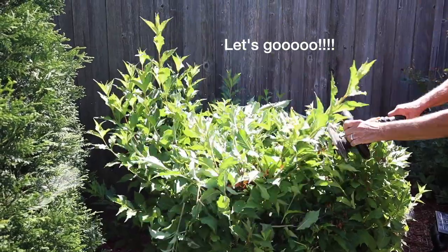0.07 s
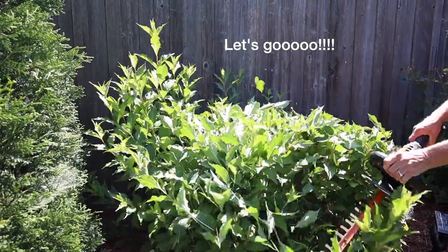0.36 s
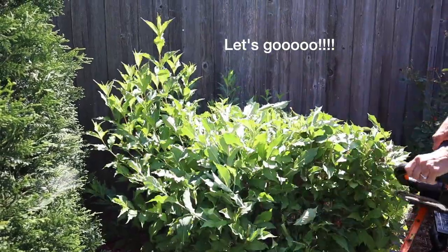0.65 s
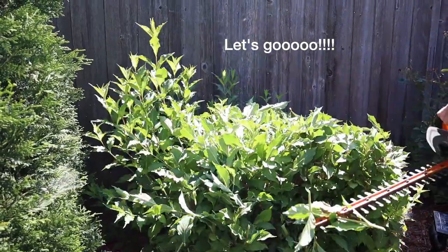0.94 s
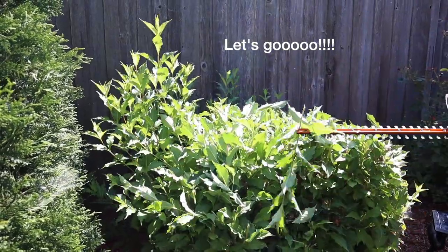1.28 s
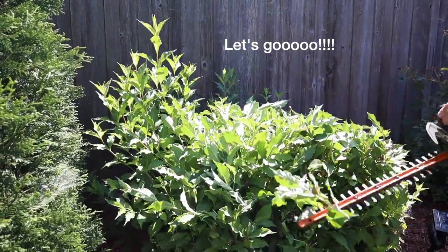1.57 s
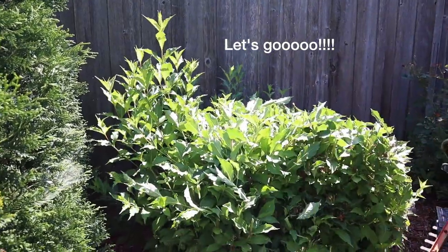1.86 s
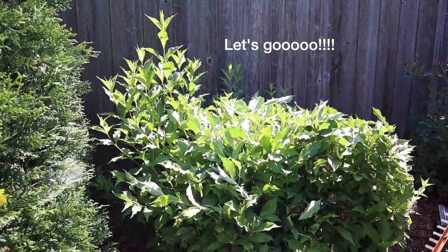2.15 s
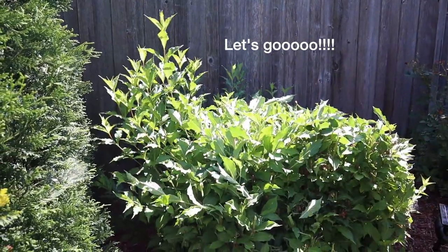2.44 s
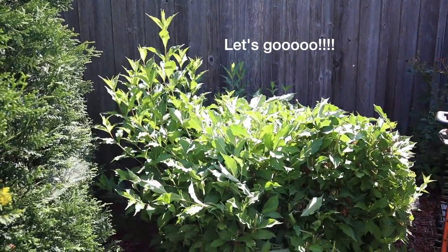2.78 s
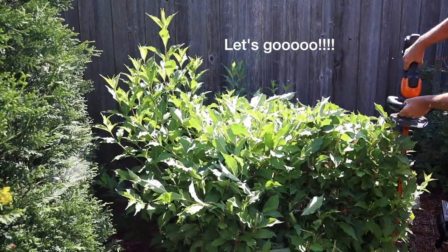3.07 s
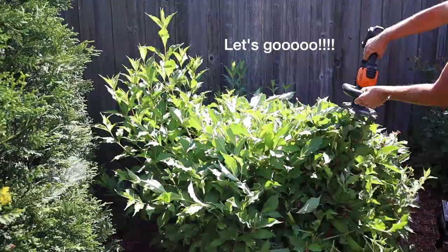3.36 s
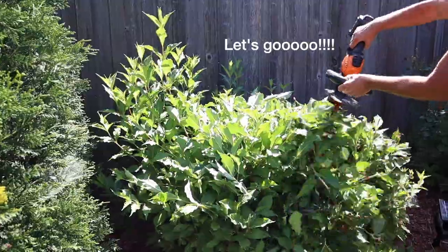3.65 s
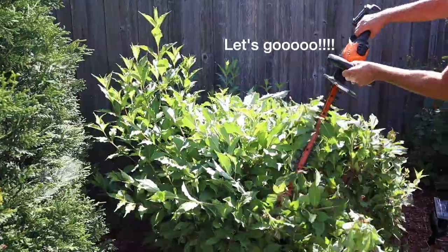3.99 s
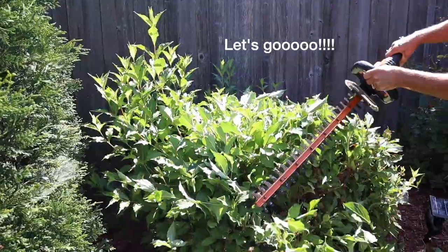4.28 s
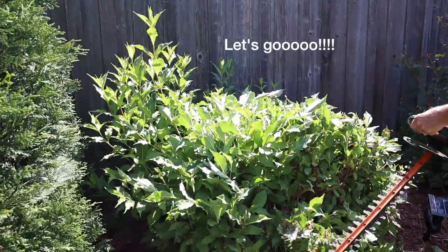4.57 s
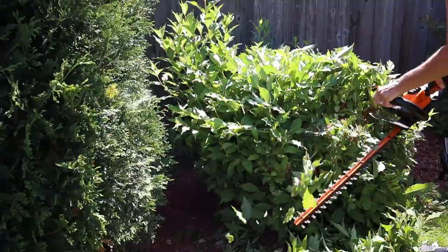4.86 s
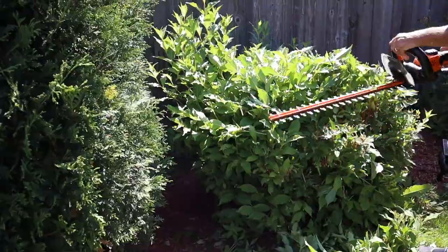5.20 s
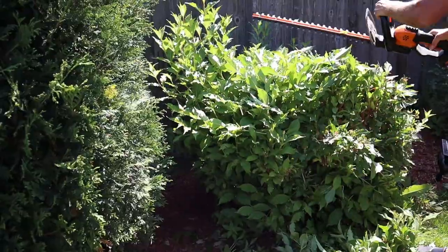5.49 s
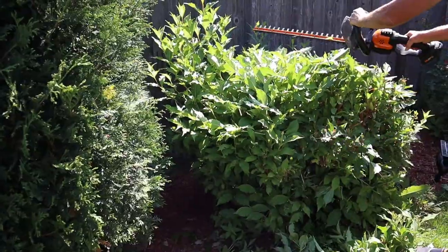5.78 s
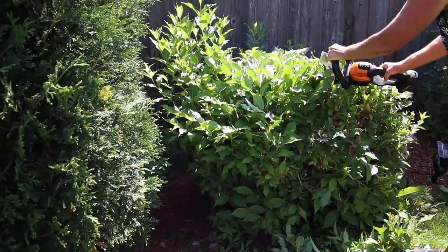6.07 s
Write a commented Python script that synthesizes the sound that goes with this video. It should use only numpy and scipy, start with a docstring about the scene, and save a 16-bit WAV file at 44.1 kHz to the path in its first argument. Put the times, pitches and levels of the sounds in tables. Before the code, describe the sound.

An electric hedge trimmer buzzes and clatters through a leafy shrub in four bursts, with twig snaps, rustling and faint traffic between.

```python
"""A cordless hedge trimmer close to the microphone, in a leafy shrub by a wooden fence, traffic far off.
It opens biting twigs, its steel blades clacking at each reversal and rasping in between. Twigs snap in
the pause, the trigger clicks and a short burst follows. The third burst goes deep: the blades slow and
knock hard. Leaves rustle, the sound drops out for a tenth of a second, and the traffic swells as the
gain control recovers. Last, the trigger clicks again for a light fourth burst."""
import sys
import numpy as np
from scipy import signal
from scipy.fft import rfft, irfft, next_fast_len
from scipy.io import wavfile
from scipy.ndimage import uniform_filter1d

SR = 44100
rng = np.random.default_rng(int(sys.argv[2]) if len(sys.argv) > 2 else 0)


def to_wav(sig):
    """Store sig (one row per channel, or 1-D mono) as 16-bit WAV at the path in sys.argv[1].

    Samples outside -1..1 are clipped; the rate is SR.
    """
    pcm = np.clip(np.atleast_2d(sig), -1, 1) * 32767
    pcm = np.round(pcm).astype(np.int16)
    wavfile.write(sys.argv[1], SR, pcm.T)  # frames by channels


N = 270333
T = np.arange(N) / SR

# Levels in the tables are relative, ahead of the mix and the gain control.
# Trigger held. Each row: on and off in seconds, blade level in dB, housing level in dB.
BURSTS = [(-.1, 0.566, -11, -19.5), (1.58, 1.917, -10, -20.5), (2.676, 4.285, -14, -22.5),
          (5.637, 6.204, -14, -21)]
# How deep the blades sit in the shrub. Each row: time in seconds, load from 0 to 1.
BLADE_LOAD = [(0, 0.39), (.27, 0.34), (.5, 0.12), (2.75, .05), (3.05, 0.21), (3.3, 0.67), (3.55, .85),
              (3.9, .68), (4.25, .55), (4.4, 0.2), (6.13, 0.06)]
# The trimmer swings in and out of the foliage. Each row: time in seconds, level at the microphone in dB.
SWING = [(0, 2), (.3, -1.5), (.52, 1), (1.62, 0), (1.8, 0.5), (2.75, -1), (3.05, -.5), (3.3, 1.5),
         (3.6, 1.5), (3.95, 3.5), (4.28, 0), (5.7, 1), (6.05, -0.5)]
# The crank's play closing. Each row: place in the stroke and strength, both from 0 to 1.
STROKE_CONTACTS = [(0.0, .7), (.07, .6), (.2, .25), (.39, .2), (.66, .2)]
# Blows close by. Each row: start in seconds, level in dB.
TWIG_BITES = [(0.028, 14), (0.055, 13.5), (.08, 4), (.1074, 9.5), (0.157, 11), (.183, 9), (.2085, 11.5),
              (1.727, 7), (3.0848, 7), (3.1302, 4.5), (3.1748, 5), (3.2223, 8), (3.271, 11), (3.3188, 10.5),
              (3.3492, 11.5), (3.3999, 12), (3.4518, 12.5), (3.5529, 13.5), (3.6581, 15.5), (3.7572, 14),
              (4.059, 9.5), (4.2612, 7), (6.107, 2.5)]  # teeth going through thick twigs
BLADE_CLACKS = [(1.586, -20), (2.708, -8), (3.398, 6), (3.555, 8), (4.708, 11)]  # blades taking up play or breaking free
TWIG_SNAPS = [(0.831, -23), (0.8605, -20.5), (0.8782, -17), (1.2979, -28), (1.417, -27), (2.144, -29),
              (4.48, -31), (4.999, -33)]  # idle blades brushing past twigs
# Blades pressed at an angle. Each row: two edges in seconds (either order), pitch and width in Hz,
# level in dB.
BLADE_SQUEALS = [(0.0, 0.253, 3800, 910, -20.5), (0.6, 0.45, 1440, 800, -19.5),
                 (3.5, 2.87, 5600, 750, -27.5), (3, 3.75, 1110, 220, -26.5), (4.5, 3.05, 488, 50, -40.5),
                 (4, 4.3, 470.5, 49, -40), (4, 4.25, 1640, 930, -23.5), (5.88, 6.13, 1450, 350, -27.5),
                 (6.07, 6.13, 3300, 900, -23)]
# The bar after a jolt. Each row: start in seconds, pitch in Hz, level in dB, decay in seconds.
BAR_PINGS = [(1.945, 10700, -40, .022), (1.945, 7950, -31, 0.021), (3.447, 3510, -5, 0.0045),
             (5.672, 680, -15, 0.0069)]
# Trigger and safety catch. Each row: start in seconds, click level in dB, spring level in dB.
TRIGGER_CLICKS = [(1.5284, -9.5, -30), (1.5392, -11, -18), (2.6012, -15, -54), (2.6363, -21.5, -29),
                  (2.665, -17.5, -33), (5.5412, -13, -23), (5.5909, -13, -38)]
# Branches brushed or springing back. Each row: middle and half length in seconds, level in dB.
LEAF_SWELLS = [(.63, 0.14, -39.5), (0.857, 0.059, -55), (1.252, 0.65, -54), (2.017, .12, -49.5),
               (4.41, .22, -43.5), (4.772, 0.15, -46), (5.01, 0.042, -46.5), (5.11, 0.036, -46.5),
               (5.3, 0.52, -58)]
# A faint tone far off. Each row: start and end in seconds, pitch in Hz, level in dB.
DISTANT_TONE = [(5.3, 5.6, 469, -43.5)]
# Resonances of the trimmer's parts. Each row: pitch in Hz, width in Hz, gain in dB.
HOUSING_RESONANCES = [(372, 27, -2), (490, 45, 1), (637, 37, -6.5), (952, 44, -4.5), (1200, 70, -3),
                      (1394, 82, -7), (1430, 180, -12), (1915, 250, -2.5), (2570, 167, 4)]
BAR_RESONANCES = [(468, 32, 0), (515, 40, -2), (1170, 110, -12), (1900, 200, -14)]
SPRING_RESONANCES = [(8550, 200, -7), (8430, 200, -2), (8660, 260, -5), (5840, 160, -12)]
# Spectra of the sources, near to far. Each row: frequency in Hz, level in dB.
STEEL_SPECTRUM = [(1470, -23), (2500, -5), (3680, -2.5), (4490, -3.5), (5490, -1), (6160, -5), (7830, 1),
                  (8660, 2.5), (10000, -3.5), (13800, -3), (15200, -5.5), (15800, -10)]
HOUSING_SPECTRUM = [(100, -32), (250, -14.5), (340, -11.5), (450, -4.5), (560, -0.5), (850, 0), (1200, 0),
                    (1650, 0.5), (2100, 1), (2600, -6), (3400, -6.5), (8000, -39)]
BITE_SPECTRUM = [(150, -10), (350, -15), (500, -26.5), (750, -8), (1100, -7), (2500, -5.5), (4000, -3),
                 (6300, -4), (8200, 6), (10200, -2.5), (12800, 1.5), (16000, -12.5)]
CLACK_SPECTRUM = [(100, -32), (250, -14), (500, -3), (2000, -2.5), (4000, -5.5), (6500, -3.5), (8300, -0.5),
                  (10500, -6), (16000, -5)]
PLASTIC_SPECTRUM = [(400, -36), (1500, -3), (3500, 6), (6000, 2.5), (9000, 0.5), (11000, -12), (16000, -20)]
LEAF_SPECTRUM = [(700, 0), (2000, 0), (4500, -4), (8500, -5.5), (11000, -14), (16000, -13.5)]
TRAFFIC_SPECTRUM = [(100, -13.5), (280, -8.5), (470, -6), (750, 1.5), (1050, 0), (1500, -4), (2300, -14),
                    (4000, -21), (8000, -31), (16000, -47.5)]
RUMBLE_SPECTRUM = [(15, -18), (25, -11), (42, -16.5), (64, 1), (110, -3), (150, -7), (260, -10), (500, -22),
                   (2000, -54.5)]

FREE_STROKES_PER_S, GEAR_RATIO = 44.8, 8
SPIN_UP_S, BRAKE_S = .04, .065  # time constant of the start; time to a standstill
LOAD_SAG = .22  # share of the speed lost at full load
STEEL_SPEED_POWER, HOUSING_SPEED_POWER = 1.77, 0.93  # amplitude grows with these powers of the spin
STEEL_LOAD_DB, HOUSING_LOAD_DB = 4, 5  # boost at full load
NIP_CHANCE, NIP_DB, NIP_SPREAD_DB = .5, -1, 1.3  # thin twigs; the chance is per stroke at full load
WHISTLE_HZ, WHISTLE_DB, WHISTLE_LEAD_S, WHISTLE_S = 3980, -42, .02, .055
STIR_DB = -64  # the leaves are never quite still
LIMIT_DB, LIMIT_SHARE = -12.5, 0.76  # gain control: threshold, share of the excess taken off
DETECTOR_S, RECOVER_DB_PER_S, FIRST_CUT_DB = .008, 5, 10.5
DROPOUT_FROM_S, DROPOUT_TO_S, CUTOFF_HZ = 4.625, 4.731, 15850


def trimmer(steel_db, housing_db, modes_db, bar_db, hum_db, housing_pulse):
    """Close up, teeth chatter under the stroke force; blades, housing and blade bar radiate it."""
    spins, speed, load = motor()
    _, _, burst_steel_db, burst_housing_db = np.transpose(BURSTS)
    steel_level = from_db(burst_steel_db) @ spins ** STEEL_SPEED_POWER
    steel_level *= from_db(STEEL_LOAD_DB * load)
    housing_level = from_db(burst_housing_db) @ spins ** HOUSING_SPEED_POWER
    housing_level *= from_db(HOUSING_LOAD_DB * load)
    strokes = np.cumsum(speed) / SR
    force = stroke_force(strokes, load, clack_s=0.0029, slide=0.48, uneven_db=2.9, load_db=-1.5)
    steel = steel_level * colour(force * grains(per_s=20000, spread_db=1.25), STEEL_SPECTRUM)
    shake = force ** housing_pulse * grains(per_s=6000, spread_db=0.5)
    ring = from_db(modes_db) * resonate(shake, HOUSING_RESONANCES)
    housing = housing_level * rms_one(colour(shake + ring, HOUSING_SPECTRUM))
    # twigs between the teeth bend the bar and make it drone
    bar = housing_level * load ** 2 * rms_one(blade_bar(force * grains(per_s=4300, spread_db=-4.5)))
    # the free-running rotor hums once per turn; cutting smothers it
    rotor_angle = 2 * np.pi * GEAR_RATIO * strokes
    hum_level = housing_level * (1 - load) ** 2 * (speed / speed.max()) ** 4
    hum = hum_level * from_db(2 * drift(40)) * np.sin(rotor_angle + .5 * drift(35))
    machine = from_db(steel_db) * steel + from_db(housing_db) * housing
    machine += from_db(bar_db) * bar + from_db(hum_db) * hum
    return from_db(in_time(SWING)) * machine


def motor():
    """Each burst's spin (0-1) climbs on the trigger and brakes on release; load slows the strokes."""
    load = np.clip(in_time(BLADE_LOAD), 0, 1)
    spins = []
    for on, off, *_ in BURSTS:
        climb = 1 - np.exp(-np.maximum(T - on, 0) / SPIN_UP_S)
        brake = np.clip(1 - (T - off) / BRAKE_S, 0, 1)
        spins.append(climb * brake)
    speed = FREE_STROKES_PER_S * sum(spins) * (1 - LOAD_SAG * load ** 2)
    return np.array(spins), speed, load


def stroke_force(strokes, load, clack_s, slide, uneven_db, load_db):
    """The crank's play closes near the same places in each stroke, over steady sliding friction."""
    clicks = np.zeros(N)
    numbers = np.arange(int(strokes[-1]) + 1)
    for place, strength in STROKE_CONTACTS:
        jitter, size = rng.standard_normal((400, 2))[:len(numbers)].T
        at = np.searchsorted(strokes, numbers + place + .02 * jitter).clip(0, N - 1)
        clicks[at] += strength * from_db(uneven_db * size + load_db * load[at])
    force = np.hypot(slide, fade(clicks, clack_s))
    return force / np.sqrt(uniform_filter1d(force ** 2, SR // 12))


def blade_bar(force):
    """The long bar rings in its modes and radiates little below them."""
    low_cut = signal.butter(4, 400, "high", fs=SR, output="sos")
    return signal.sosfilt(low_cut, resonate(force, BAR_RESONANCES))


def bites(bite_db, thud_db, clack_db):
    """Teeth jam on twigs and give way with a crunch that knocks the bar; the blades clack free."""
    _, speed, load = motor()
    reversals = np.flatnonzero(np.diff(np.floor(np.cumsum(speed) / SR)))
    # under load, any fast stroke may nip a thin twig
    draws, sizes = rng.random(400), rng.standard_normal(400)
    chance = NIP_CHANCE * load * (speed > FREE_STROKES_PER_S * 3 / 4)
    nips = [(T[i], NIP_DB + NIP_SPREAD_DB * size)
            for i, draw, size in zip(reversals, draws, sizes) if draw < chance[i]]
    crunch = from_db(bite_db) * blows(nips + TWIG_BITES, rise_s=0.0014, decay_s=0.0048)
    thud = from_db(thud_db) * blade_bar(crunch * load)
    clack = from_db(clack_db) * blows(BLADE_CLACKS, rise_s=0.00016, decay_s=0.012)
    return colour(crunch, BITE_SPECTRUM) + thud + colour(clack, CLACK_SPECTRUM)


def squeals():
    """While the blades run, friction chatter caught in one resonance swells and fades."""
    spins, _, _ = motor()
    out = np.zeros(N)
    for start, end, hz, width, db in BLADE_SQUEALS:
        mode = [(hz, width, 0)]
        chatter = resonate(resonate(rng.standard_normal(N), mode), mode)
        out += from_db(db) * swell(start, end) * rms_one(chatter)
    return out * spins.sum(0) ** 2


def pings():
    """After a jolt the steel bar rings on in single damped modes."""
    out = np.zeros(N)
    for start, hz, db, decay_s in BAR_PINGS:
        age = np.maximum(T - start, 0)
        out += from_db(db) * np.exp(-age / decay_s) * np.sin(2 * np.pi * hz * age)
    return out


def whistle():
    """The motor gives a short high tone as it gets going."""
    starts = [on - WHISTLE_LEAD_S for on, *_ in BURSTS]
    return tones([(start, start + WHISTLE_S, WHISTLE_HZ, WHISTLE_DB) for start in starts])


def trigger(click_db, spring_db):
    """At the handle, plastic parts click home and the switch spring rings."""
    click = colour(blows(TRIGGER_CLICKS, rise_s=.0001, decay_s=0.0018), PLASTIC_SPECTRUM)
    pluck = blows([(s, ring_db) for s, _, ring_db in TRIGGER_CLICKS], rise_s=.0001, decay_s=0.002)
    return from_db(click_db) * click + from_db(spring_db) * resonate(pluck, SPRING_RESONANCES)


def shrub(rustle_db, snap_db, flutter_db):
    """Near the microphone, leaves brush each other in swells and thin twigs snap."""
    swells = sum(from_db(db) * np.exp(-((T - s) / half) ** 2) for s, half, db in LEAF_SWELLS)
    stir = (from_db(STIR_DB) + swells) * from_db(rustle_db + flutter_db * drift(65))
    rustle = stir * grains(per_s=5100, spread_db=-5.0)
    snaps = from_db(snap_db) * blows(TWIG_SNAPS, rise_s=0.00041, decay_s=0.0024)
    return colour(rustle + snaps, LEAF_SPECTRUM)


def yard(near, fence_s, fence_db, scatter_db, t60_s):
    """The fence, a few metres off, adds one echo; ground and foliage scatter a short tail."""
    t = T[:SR // 2]
    tail = rng.standard_normal(len(t)) * from_db(-60 * t / t60_s) * (t > .002)
    tail = signal.sosfilt(signal.butter(1, 7000, fs=SR, output="sos"), tail)
    response = from_db(scatter_db) * tail / np.linalg.norm(tail)
    response[round(fence_s * SR)] += from_db(fence_db)
    return near + signal.fftconvolve(near, response)[:N]


def neighbourhood(traffic_db, rumble_db, hum_db, hum_hz):
    """Far off: steady traffic, a low rumble, a wavering machine hum and one brief tone."""
    traffic = from_db(traffic_db) * colour(rng.standard_normal(N), TRAFFIC_SPECTRUM)
    rumble = from_db(rumble_db) * colour(rng.standard_normal(N), RUMBLE_SPECTRUM)
    hum = from_db(hum_db) * np.sin(2 * np.pi * hum_hz * T + drift(6))
    return traffic + rumble + hum + tones(DISTANT_TONE)


def from_db(db):
    """Decibels to gain."""
    return 10 ** (np.asarray(db) / 20)


def rms_one(x):
    """Scale to unit rms."""
    return x / np.sqrt(np.mean(x ** 2) + 1e-20)


def in_time(rows):
    """A curve of (seconds, value) points at every sample."""
    return np.interp(T, *np.transpose(rows))


def drift(per_s):
    """A random wander with a spread of 1."""
    return np.interp(T * per_s, np.arange(4000), rng.standard_normal(4000)) / np.sqrt(2 / 3)


def swell(start, end):
    """A rounded rise and fall between two times."""
    return np.sin(np.pi * np.clip((T - start) / (end - start), 0, 1)).clip(0) ** .5


def tones(rows):
    """Slightly wavering tones that swell and fade."""
    out = np.zeros(N)
    for start, end, hz, db in rows:
        phase = 2 * np.pi * hz * T + .5 * drift(49)
        out += np.sqrt(2) * from_db(db) * swell(start, end) * np.sin(phase)
    return out


def colour(x, spectrum):
    """Minimum-phase filter with the given spectrum; white noise keeps its power."""
    size = next_fast_len(N + 8192, real=True) // 2 * 2
    hz, db = np.transpose(spectrum)
    bin_hz = np.arange(size // 2 + 1) * SR / size
    gain = rms_one(from_db(np.interp(np.log(bin_hz + 1), np.log(hz), db)))
    # folding the cepstrum keeps the ringing after each blow
    cepstrum = irfft(np.log(gain))
    cepstrum[1:size // 2] *= 2
    cepstrum[size // 2 + 1:] = 0
    return irfft(rfft(x, size) * np.exp(rfft(cepstrum)))[:N]


def resonate(x, modes):
    """Parallel resonances, each with its own peak gain."""
    out = 0
    for hz, width, db in modes:
        radius = np.exp(-np.pi * width / SR)
        feedback = [1, -2 * radius * np.cos(2 * np.pi * hz / SR), radius ** 2]
        out += from_db(db) * (1 - radius ** 2) / 2 * signal.lfilter([1, 0, -1], feedback, x + 1e-18)
    return out


def fade(clicks, decay_s):
    """Every click leaves an exponential tail of its own height."""
    return signal.lfilter([1], [1, -np.exp(-1 / (decay_s * SR))], clicks + 1e-18)


def blows(rows, rise_s, decay_s):
    """Noise that swells quickly and dies away at each (seconds, dB)."""
    clicks = np.zeros(N)
    for start, db, *_ in rows:
        clicks[round(start * SR)] = from_db(db)
    return (fade(clicks, decay_s) - fade(clicks, rise_s)) * rng.standard_normal(N)


def grains(per_s, spread_db):
    """Tiny random impacts of uneven size."""
    sizes = from_db(spread_db * np.minimum(rng.exponential(1, N), 4))
    signs = rng.choice([-1, 1], N)
    return rms_one(sizes * signs * (rng.random(N) < per_s / SR))


def gain_control(x):
    """Loud peaks turn the gain down at once; it creeps back up, so the background swells in pauses."""
    power = np.abs(uniform_filter1d(x[0] ** 2, size=round(DETECTOR_S * SR)))
    excess_db = np.maximum(10 * np.log10(power + 1e-12) - LIMIT_DB, 0)
    recovery_db = RECOVER_DB_PER_S * T
    held_db = np.maximum.accumulate(np.maximum(LIMIT_SHARE * excess_db + recovery_db, FIRST_CUT_DB))
    return x * from_db(-uniform_filter1d(held_db - recovery_db, size=88))


def scene():
    """One microphone in the yard: trimmer and shrub close by, the neighbourhood behind."""
    near = trimmer(steel_db=-1.98, housing_db=-1.36, modes_db=-4.5, bar_db=-11.5, hum_db=-15.5,
                   housing_pulse=0.77)
    near += squeals() + whistle() + pings()
    near += bites(bite_db=-7.0, thud_db=9.0, clack_db=-9.5)
    near += trigger(click_db=-9.0, spring_db=16.5)
    near += shrub(rustle_db=4.0, snap_db=-1.0, flutter_db=0.5)
    garden = yard(near, fence_s=0.017, fence_db=-23.5, scatter_db=-15.0, t60_s=0.054)
    far = neighbourhood(traffic_db=-36.5, rumble_db=-41.0, hum_db=-45.5, hum_hz=143.1)
    return (garden + far)[None]


def record(dry):
    """After the microphone: gain control, one brief dropout, rounded peaks and a steep top cut."""
    live = (T < DROPOUT_FROM_S) | (T > DROPOUT_TO_S)
    rounded = 1.384 * np.tanh(gain_control(dry) * live / 1.217)
    return signal.sosfilt(signal.ellip(12, .1, 80, CUTOFF_HZ, fs=SR, output="sos"), rounded)


dry = scene()
out = record(dry)
to_wav(out)
```